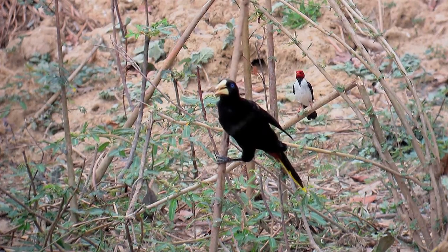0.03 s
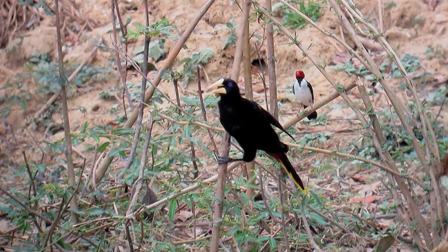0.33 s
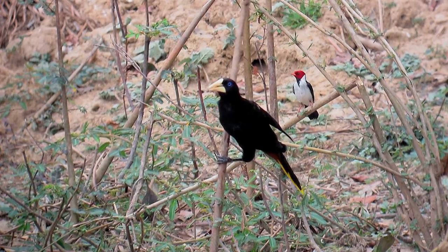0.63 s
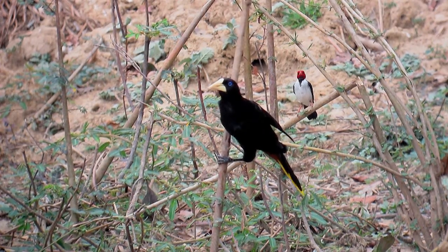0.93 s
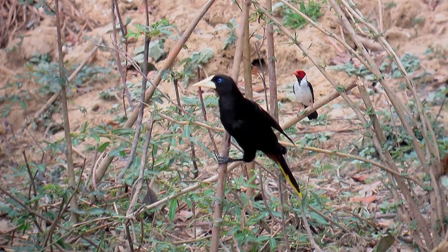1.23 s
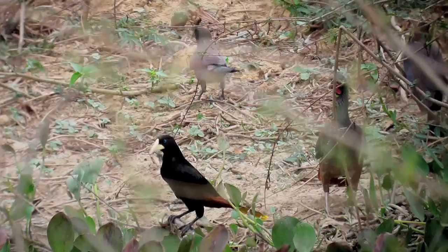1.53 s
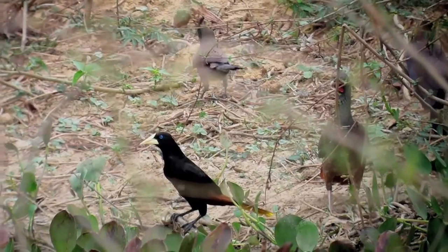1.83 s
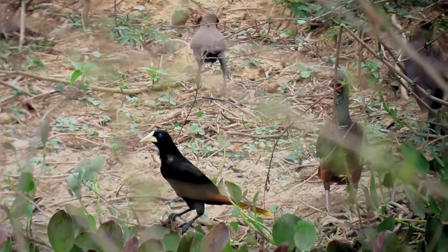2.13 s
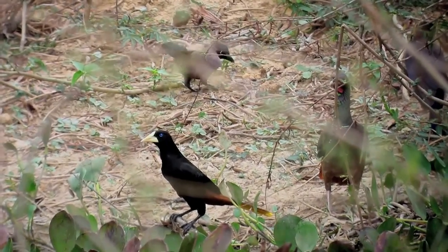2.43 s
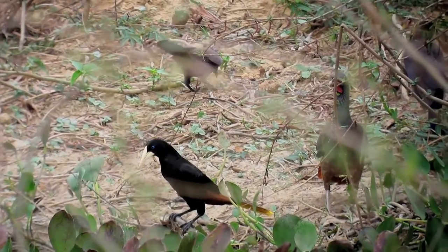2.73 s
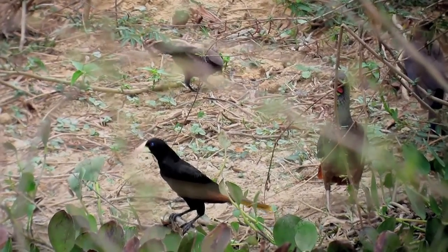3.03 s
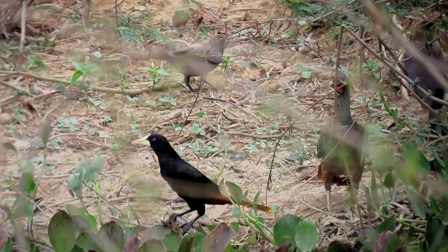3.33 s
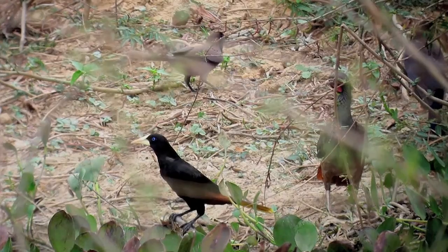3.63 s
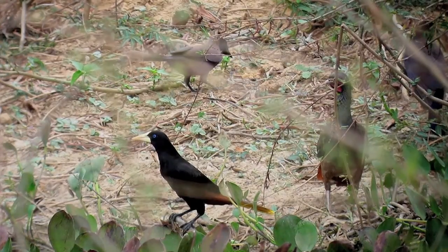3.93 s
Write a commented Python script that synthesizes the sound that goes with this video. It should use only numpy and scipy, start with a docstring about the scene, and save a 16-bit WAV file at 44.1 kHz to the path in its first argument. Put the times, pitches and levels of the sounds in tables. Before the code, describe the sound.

A bird gives about three harsh, rattling caws in the first second, while wind thumps on the right of the microphone. The sound cuts out for an instant near 1.5 seconds, then dry ticks come from the twigs. One twig snaps sharply at 3 seconds. A faint far trill and small chirps follow from about 3.4 seconds. Outdoor air, hiss and a thin whine lie underneath.

```python
"""A bird's harsh caws fill the first second: an arching tone and its rasp, chopped into a fast rattle.
Wind buffets the right microphone port. The sound drops out for an instant; then come dry ticks among
the twigs, one sharp snap with a wooden ring, a far trill and small chirps.
Outdoor air, microphone hiss and a thin camera whine lie under the feeding ground."""
import sys
import numpy as np
from scipy import signal
from scipy.fft import rfft, irfft, next_fast_len
from scipy.io import wavfile
from scipy.ndimage import uniform_filter1d, map_coordinates

SR = 44100
rng = np.random.default_rng(int(sys.argv[2]) if len(sys.argv) > 2 else 0)


def dump_mix(stems):
    """Bounce the given channels to the path in sys.argv[1] as a 16-bit WAV at rate SR."""
    frames = np.atleast_2d(stems).T  # one column per channel
    limited = np.clip(frames, -1, 1)  # hard clip at full scale
    pcm = np.round(limited * 32767).astype(np.int16)
    wavfile.write(sys.argv[1], SR, pcm)


N = 176400
T = np.arange(N) / SR

# Pitch arcs of the caws: t/s, f/Hz
CAW_PITCH = [(0, 735), (.07, 720), (.135, 850), (.175, 770), (.21, 762), (.245, 782), (.29, 760),
             (.35, 680), (.41, 755), (.44, 825), (.468, 832), (.525, 690), (.538, 760), (.58, 782),
             (.65, 680), (.765, 775), (.795, 815), (.862, 715), (.882, 782), (.96, 685)]
# Envelope and tone colour of the run: t/s, level/dB, body/dB, harshness/dB
CAW_SHAPE = [(0, -42.5, 3, -1), (0.041, -50, -8, 3), (.06, -57, -9, 6), (.135, -54, 5, 13),
             (.146, -41.5, -1, -1), (.19, -35, -11, -7), (0.21, -36.5, 6, 6), (.24, -36, 2, 9.5),
             (.30, -37.5, 0.5, -1), (.35, -46.5, 2, -6), (.375, -82.5, -10, -9.5), (0.413, -47.5, -5, 8),
             (0.429, -35.5, -7, -2), (.47, -33.5, -8, -0.5), (.512, -36.5, -21, -3.5),
             (.536, -42.5, -5.5, -1.5), (.575, -35.5, -6, -11), (.615, -41, -6, -6), (.63, -50, -15, -2),
             (.68, -52, -24, 1), (.71, -60, 0, 13), (0.759, -49, -3, 12), (.784, -38, -6, 4),
             (.825, -36, -10, 3.5), (.856, -39.5, -17, 6.5), (.882, -33.5, -7, -12),
             (.925, -43.5, -2.5, 4.5), (.99, -54, -5, 11), (1.04, -81, -0.5, -3)]
# Partials of the voice: multiple of the pitch, level/dB, share of body, share of harshness
CAW_PARTIALS = [(1, -22.5, 0.63, 0), (1.88, -8.5, 1, 0), (2.66, -8, 0.27, 0.25), (3, -0.5, 0.016, 0),
                (3.55, -12, 0, 0.51), (4, -9, 0.14, .4), (5, -16.5, 0.96, 1), (6, -11, 0.31, 0.48),
                (6.4, -21.5, 0, .5), (8, -25, 0.7, 1)]
# Colour of the rasp: f/Hz, level/dB
RASP_EQ = [(500, -35), (1080, -17), (1480, -8.5), (1760, -9.5), (2050, -13), (2500, -5.5), (3150, -5),
           (3750, -10), (5100, -13.5), (6000, -20), (7300, -20), (9500, -32), (13500, -43), (16000, -50)]
RATTLE_HZ, USUAL_PITCH_HZ = 89.76, 773  # the rattle runs at this rate at this pitch


def caws():
    """A rough tone and its rasp pulse in a rattle that slows as the pitch falls."""
    times, *curves = np.transpose(CAW_SHAPE)
    db, body_db, harsh_db = (np.interp(T, times, curve) for curve in curves)
    pitch = np.interp(T, *np.transpose(CAW_PITCH))
    rattle_hz = RATTLE_HZ * (pitch / USUAL_PITCH_HZ) ** 1.79 * (1 + .11 * wobble(59.35))
    beats = np.cumsum(rattle_hz) / SR
    pulses = unit(.32 + np.abs(np.sin(np.pi * beats)) ** 2.3)  # never quite closes
    rattle = pulses * amp(wobble(90))
    # Every beat lands a little off pitch and swings around it.
    detune = .014 * rng.standard_normal(2000)[beats.astype(int)]
    swing = .024 * np.sin(2 * np.pi * beats)
    phase = 2 * np.pi * np.cumsum(pitch * (1 + detune + swing)) / SR
    phase += .09 * amp(harsh_db / 2) * wobble(450)  # fast jitter adds grit
    tone = sum(amp(base_db + body * body_db + harsh * harsh_db)
               * np.sin(multiple * phase + rng.uniform(0, 2 * np.pi))
               for multiple, base_db, body, harsh in CAW_PARTIALS)
    rasp = amp(-12 + .8 * harsh_db) * noise(RASP_EQ)
    return amp(db) * (rattle * tone + np.sqrt(rattle) * rasp)


# Decay of the outdoor tail: f/Hz, t60/s
ECHO_DECAY = [(200, 0.076), (2300, 0.4772), (5000, 0.23), (12000, 0.08)]


def echo(x, delay_s=0.028):
    """The bank and bushes answer, each frequency dying at its own speed."""
    hz, t, spectra = signal.stft(rng.standard_normal((2, SR // 2)), SR, nperseg=256)
    decay = amp(-60 * t / along(ECHO_DECAY, hz)[:, None])
    mid, side = signal.istft(spectra * decay, SR, nperseg=256)[1]
    tail = mid + np.array([[.45], [-.45]]) * side
    delayed = np.pad(x, (round(delay_s * SR), 0))[None]
    return signal.fftconvolve(delayed, tail / np.linalg.norm(tail[0]), axes=1)[:, :N]


# Colour of the crack: f/Hz, level/dB
CRACK_EQ = [(100, -19), (500, -14.5), (850, -7.5), (1650, -12.5), (2100, 4.5), (2550, 1), (3150, -1.5),
            (4100, -10), (5200, 0), (7000, -9.5), (8000, -14), (9500, -13), (13200, -11.5), (16000, -33)]
# Ringing modes of the twig: f/Hz, level/dB, t60/s
TWIG_MODES = [(600, -11, 0.05), (765, -5.5, 0.061), (978, -5, 0.053), (1370, -4, 0.031), (1750, -12, 0.04),
              (2015, 2, 0.034), (2294, 9, 0.023), (2510, -3, .02), (3010, -3, .026), (3340, -4.5, 0.025),
              (5190, -7, 0.04), (6330, -7, 0.034)]
# Placement of the snap: f/Hz, left minus right/dB
SNAP_PAN = [(500, -3), (2200, -2), (3200, 0), (5500, -2.5), (10000, -2), (13000, -9)]


def snap(start_s=3.0071, hold_s=0.0032, crack_t60_s=0.017):
    """A twig gives way: a few milliseconds of cracking and a short wooden ring."""
    t = np.clip(T - start_s, 0, 1)
    crack_db = -18 - 60 * np.maximum(t - hold_s, 0) / crack_t60_s
    crack = amp(crack_db) * (1 - np.exp(-t / 0.001)) * noise(CRACK_EQ)
    ring = sum(amp(-22 + db - 60 * t / t60) * np.sin(2 * np.pi * hz * t) for hz, db, t60 in TWIG_MODES)
    attack = 1 - np.exp(-t / 0.0007)
    return pan_by_band((crack + ring) * attack, SNAP_PAN)


# Tick cues: t/s, level/dB, rise/s, t60/s, tilt/(dB per octave), left minus right/dB
TICK_CUES = [(.829, -37.5, 0.00072, 0.02787, -3, -1.5), (1.591, -37, 0.002, 0.075, 0.5, 4),
             (1.753, -39, 0.0013, 0.018, 4.5, -6), (1.807, -29, 0.00017, 0.012, 0.5, -11),
             (1.831, -45, 0.00081, 0.041, -1.5, -12), (1.849, -45.5, 0.00084, 0.04315, 2, -3),
             (2.974, -34.5, 0.0018, 0.048, -2, -2), (3.173, -52, 0.001154, 0.043, -1, -22),
             (3.512, -36.5, 0.00094, 0.02181, 0, -3.5), (3.779, -40.5, 0.001087, 0.02705, 3, 0)]
# Colour of dry litter: f/Hz, level/dB
LITTER_EQ = [(100, -16), (500, -12), (900, -1), (1600, -9), (2200, -9), (3200, -11), (4200, -7),
             (5800, -3.5), (7000, -14.5), (8000, -20), (10000, -18.5), (13000, -16), (16000, -33.5)]


def ticks():
    """Small dry cracks in the litter, each with its own brightness."""
    out, n = np.zeros((2, N)), SR // 8
    t, hz = T[:n], np.fft.rfftfreq(n, 1 / SR)
    for start, db, rise, t60, tilt, pan_db in TICK_CUES:
        colour = amp(along(LITTER_EQ, hz) + tilt * np.log2((hz + 500) / 2000))
        burst = unit(irfft(rfft(rng.standard_normal(n)) * colour, n))
        envelope = amp(db - 60 * t / t60) * np.minimum(t / rise, 1)
        out[:, round(start * SR):][:, :n] += pan(pan_db) * envelope * burst
    return out


# Gusts on the left port: t/s, level/dB
LEFT_GUSTS = [(0, -37), (.35, -39.5), (.6, -51), (1.0, -61.5), (1.44, -62), (1.5, -63), (4, -74)]
# Gusts on the right port: t/s, level/dB
RIGHT_GUSTS = [(0, -26.5), (.12, -29), (.17, -32), (.21, -24.5), (.3, -27.5), (.42, -32), (.55, -40),
               (.635, -33), (.69, -44), (.76, -38), (.83, -47), (.92, -41), (1.0, -52), (1.34, -53),
               (1.385, -31), (1.45, -33), (1.47, -80), (2.5, -66), (2.67, -46), (2.85, -62), (4, -80)]
# Colour of the rumble: f/Hz, level/dB
RUMBLE_EQ = [(12, -15), (30, -2.5), (85, 4), (140, -3.5), (220, -16.5), (330, -24.5), (600, -49),
             (1500, -57), (5000, -100)]
# Thumps of air: t/s, peak before the low-pass/dB, f/Hz
BUMP_CUES = [(0.103, -17.5, 80), (0.215, -14.5, 96), (0.224, -18, 190), (0.254, -18, 199),
             (0.367, -23, 135), (0.634, -23.5, 79.5), (0.905, -20.5, 68), (1.45, -17, 80),
             (1.456, -17, 178), (1.832, -26.5, 146)]


def wind(cutoff_hz=340):
    """Lumpy rumble, unrelated between the ports, and push-pull bumps of air mainly on the right one."""
    rumble = np.array([level(gusts) * unit(noise(RUMBLE_EQ) * amp(4.1 * wobble(35.48)))
                       for gusts in (LEFT_GUSTS, RIGHT_GUSTS)])
    bumps = np.zeros(N)
    for centre, db, hz in BUMP_CUES:
        u = 2 * np.pi * hz * (T - centre)
        bumps -= amp(db) * u * np.exp((1 - u * u) / 2)
    return rumble + amp([[-22], [0]]) * filtered(bumps, lambda hz: 1 / (1 + (hz / cutoff_hz) ** 6))


# Fader ride of the trill: t/s, level/dB
TRILL_LEVEL = [(0, -68), (.85, -64), (.96, -59), (1.08, -66), (1.2, -85.5), (3.38, -93.5), (3.47, -65),
               (3.66, -61), (3.85, -63), (4, -70)]
# Its centre pitch: t/s, f/Hz
TRILL_PITCH = [(1.2, 5118), (3.43, 4500), (3.51, 4975), (3.7, 4900), (4, 5043)]


def far_trill(width_hz=340, flicker_db=2.5):
    """A thin buzzing trill, blurred by distance into a flickering band of noise."""
    blur = unit(filtered(rng.standard_normal((2, N)), lambda hz: 1 / (1 + (hz / width_hz) ** 2)))
    phase = 2 * np.pi * np.cumsum(np.interp(T, *np.transpose(TRILL_PITCH))) / SR
    band = blur[0] * np.sin(phase) + blur[1] * np.cos(phase)
    return level(TRILL_LEVEL) * amp(flicker_db * wobble(35)) * band


# Note cues, the first being the far trill's rising opening note: t/s, level/dB, end pitch/Hz, length/s,
# starting offset as a fraction of the end pitch
CHIRP_CUES = [(3.43, -59, 4970, .05, -.05), (3.576, -55, 748, 0.032, 0.16), (3.73, -40, 1272, 0.023, 0.13),
              (3.857, -51.5, 2110, 0.025, .08)]


def chirps():
    """Short pure notes glide onto their end pitch: first the far trill's rising opening note, then small birds'
    chirps."""
    out = np.zeros(N)
    for start, db, hz, length, offset in CHIRP_CUES:
        progress = np.clip((T - start) / length, 0, 1)
        phase = 2 * np.pi * np.cumsum(hz * (1 + offset * (1 - progress) ** 2.6)) / SR
        out += amp(db) * np.sin(np.pi * progress ** .5) * np.sin(phase)
    return out


# Colour of the chatter: f/Hz, level/dB
CHATTER_EQ = [(900, -30), (1400, -12), (2100, 2), (2800, -8), (4000, -18)]


def chatter():
    """Far birds merge into one faint, fluttering swell."""
    return swell(centre_s=3.73, width_s=0.19) * amp(-60.5 + 5 * wobble(30)) * noise(CHATTER_EQ)


# Colour of the rustle: f/Hz, level/dB
RUSTLE_EQ = [(7000, -34), (11000, 2), (13300, 0.5), (14500, -11), (16000, -25.5)]


def rustle():
    """One airy rustle from the right as the calling starts."""
    return pan(-8) * amp(-63.5) * swell(centre_s=.18, width_s=.085) * noise(RUSTLE_EQ)


# Colour of the outdoor bed: f/Hz, level/dB
AIR_EQ = [(15, -35), (25, -10.5), (49, -4), (129, -5.5), (194, -6.5), (229, -5), (305, -8.5), (415, -10),
          (1330, -18), (2100, -18.5), (3450, -24.5), (5060, -26), (7400, -31), (9620, -33.5), (16300, -120)]
# Its fader ride: t/s, level/dB
AIR_LEVEL = [(0, -48), (1.46, -46.5), (1.5, -52.5), (2.1, -50.5), (2.7, -47.5), (3.3, -49), (4, -46.5)]
# Its stereo likeness: f/Hz, left-right correlation
AIR_CORRELATION = [(60, 0.044), (240, 0.31), (950, 0.36), (3770, 0.03918), (15000, 0.078)]
# Its placement: f/Hz, left minus right/dB
AIR_PAN = [(60, -10), (240, -4.5), (950, -3.0), (3770, -0.5), (15000, 1.5)]


def outdoor_air():
    """A wide, gently wavering bed of noise whose low end leans right."""
    def mid_side_gains(hz):
        angle = np.arccos(along(AIR_CORRELATION, hz)) / 2
        return amp(along(AIR_EQ, hz)) * [np.cos(angle), np.sin(angle)]

    mid, side = filtered(rng.standard_normal((2, N)), mid_side_gains)
    air = unit(pan_by_band(np.array([mid + side, mid - side]), AIR_PAN))
    return level(AIR_LEVEL) * amp(0.069 * wobble(5.8)) * air


# Colour of the hiss: f/Hz, level/dB
HISS_EQ = [(5000, -40), (7400, -1), (9300, -4), (10000, 8), (10800, 6), (11300, -0.5), (13500, -1.5),
           (15800, -8)]
# Fader ride of hiss and whine together: t/s, level/dB
HISS_LEVEL = [(0, -61), (1.46, -62), (1.5, -70), (2.1, -67.5), (2.7, -65), (4, -62.5)]


def camera_noise(whine_hz=8800.1, whine_db=-7):
    """Microphone hiss and the camera's thin, unsteady whine."""
    pitch = whine_hz + 45 * np.array([wobble(120), wobble(120)])
    whine = amp(whine_db) * np.sin(2 * np.pi * np.cumsum(pitch, axis=1) / SR)
    hiss = np.array([noise(HISS_EQ), noise(HISS_EQ)])
    return level(HISS_LEVEL) * (hiss + whine)


def amp(db):
    """Decibels to gain."""
    return 10 ** (np.asarray(db) / 20)


def unit(x):
    """Scale to rms 1."""
    return x / np.sqrt(np.mean(x ** 2) + 1e-20)


def along(points, hz):
    """Read (f/Hz, value) points on a log frequency axis."""
    freqs, values = np.transpose(points)
    return np.interp(np.log(hz + 1), np.log(freqs + 1), values)


def level(rows):
    """Gain per sample from (t/s, level/dB) points."""
    return amp(np.interp(T, *np.transpose(rows)))


def swell(centre_s, width_s):
    """A bell-shaped fade in and out."""
    return np.exp(-((T - centre_s) / width_s) ** 2)


def wobble(rate):
    """A smooth random curve, rate knots a second."""
    return map_coordinates(rng.standard_normal(int(N * rate / SR) + 4), [T * rate])


def filtered(x, response):
    """Shape x with a frequency response."""
    size = next_fast_len(N + SR // 4)
    return irfft(rfft(x, size) * response(np.fft.rfftfreq(size, 1 / SR)), size)[..., :N]


def noise(eq):
    """Coloured noise of rms 1."""
    return unit(filtered(rng.standard_normal(N), lambda hz: amp(along(eq, hz))))


def pan(db):
    """Left and right gains; positive is left."""
    return amp(np.array([[db], [-db]]) / 2)


def pan_by_band(x, points):
    """Give each frequency its own place between left and right."""
    return filtered(x, lambda hz: amp(np.outer([.5, -.5], along(points, hz))))


def ports(x, lag_ms):
    """Treble reaches the left microphone port a little late."""
    def response(hz):
        lag_s = lag_ms / 1000 * np.clip((hz - 1500) / 3500, 0, 1)
        return np.exp(np.array([[-1j], [1j]]) * np.pi * hz * lag_s)

    return filtered(x, response)


def scene():
    """Birds and twigs in open scrub, over wind and hiss."""
    voice = caws()
    calls = voice + far_trill() + chirps() + chatter() + amp(-12) * echo(voice)
    birds = ports(pan(-0.54) * calls, lag_ms=0.17)
    twigs = ports(ticks() + snap(), lag_ms=0.11)
    return birds + twigs + rustle() + wind() + outdoor_air() + camera_noise()


# The camera's treble notch: f/Hz, gain/dB
NOTCH_EQ = [(7450, 0), (7800, -14), (8000, -45), (8350, -45), (8600, -12), (8750, 0)]


def record(dry, mute_s=1.463, unmute_s=1.496, top_hz=15800):
    """The sound drops out briefly; the camera has a narrow treble notch and a band limit."""
    gate = uniform_filter1d(1. * ((T < mute_s) | (T > unmute_s)), size=60)
    return filtered(dry * gate, lambda hz: amp(along(NOTCH_EQ, hz)) * (hz < top_hz))


dry = scene()
out = record(dry)
dump_mix(out)
```